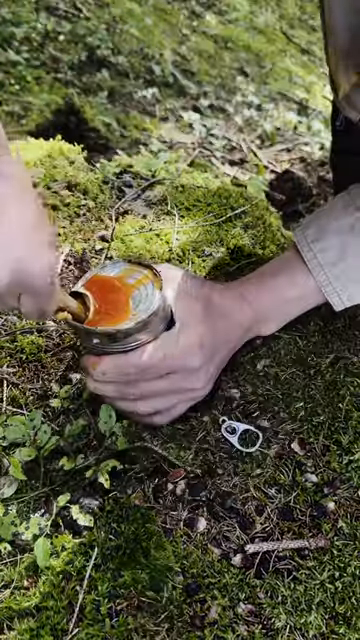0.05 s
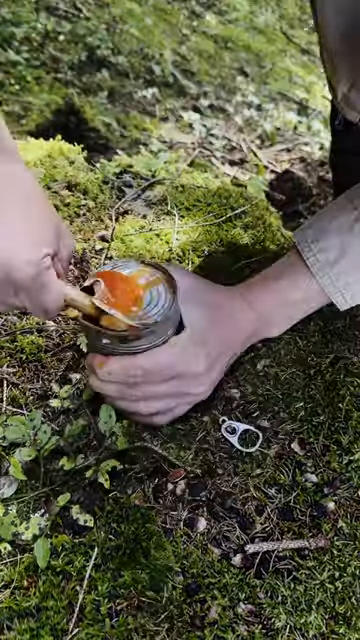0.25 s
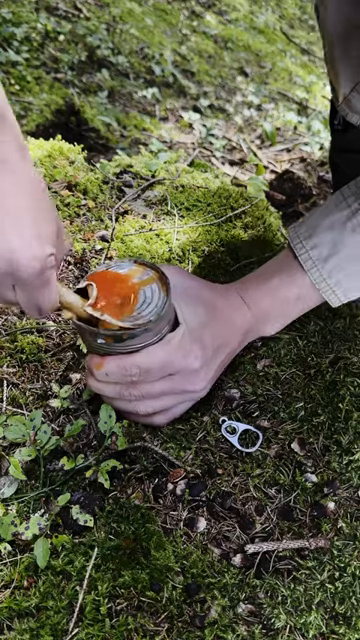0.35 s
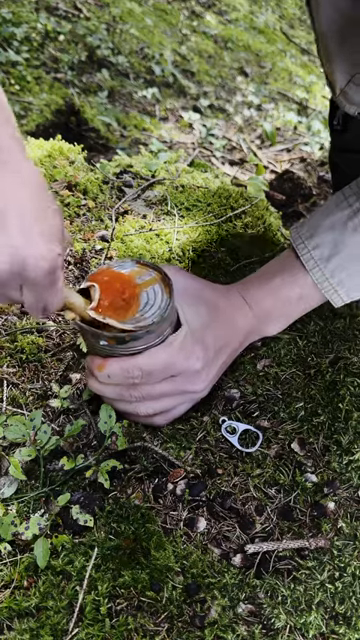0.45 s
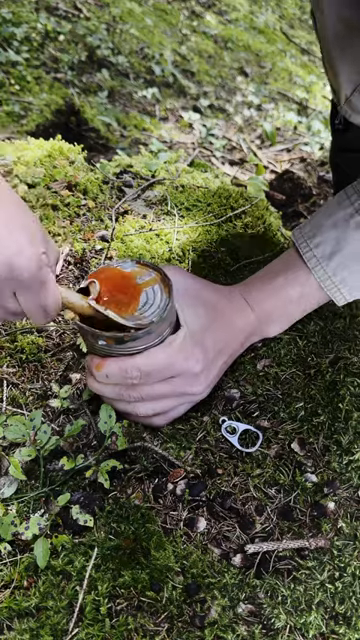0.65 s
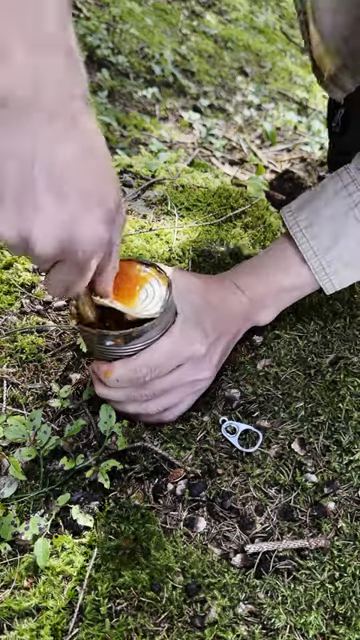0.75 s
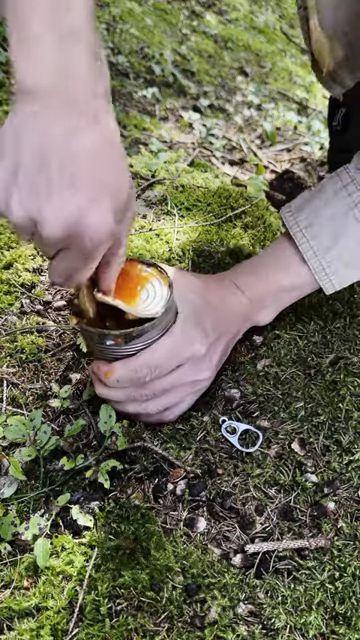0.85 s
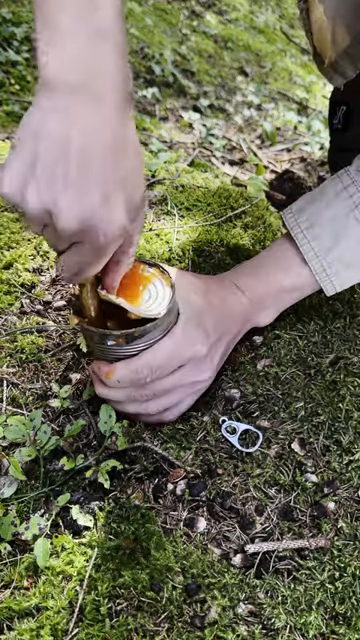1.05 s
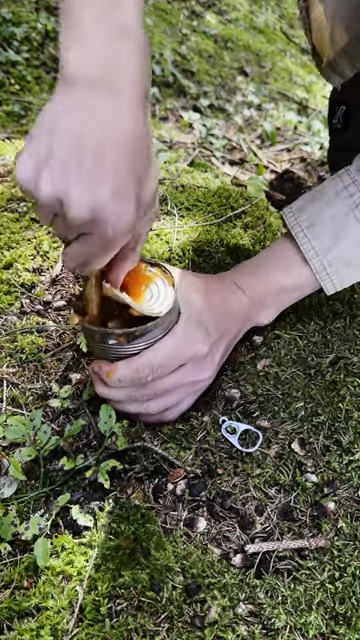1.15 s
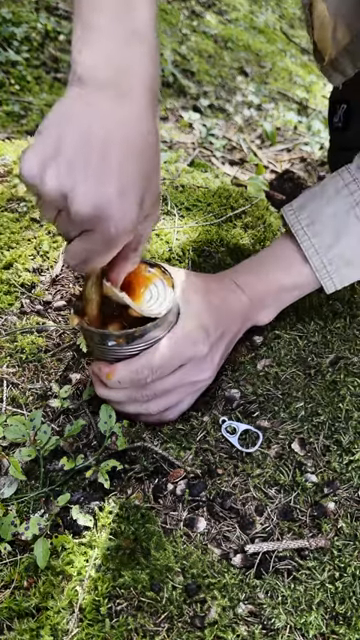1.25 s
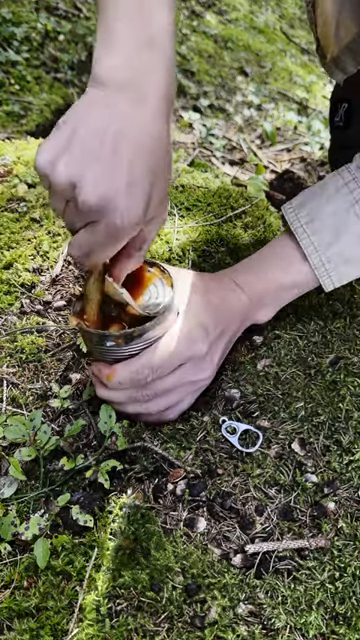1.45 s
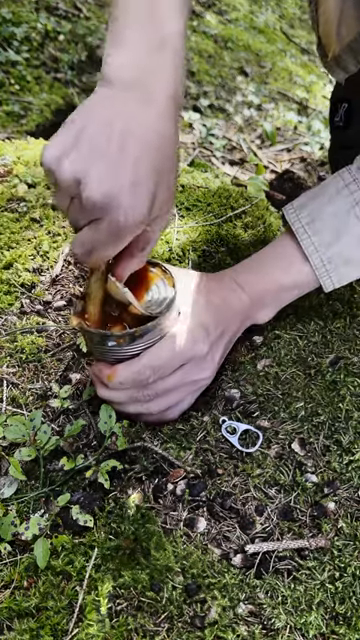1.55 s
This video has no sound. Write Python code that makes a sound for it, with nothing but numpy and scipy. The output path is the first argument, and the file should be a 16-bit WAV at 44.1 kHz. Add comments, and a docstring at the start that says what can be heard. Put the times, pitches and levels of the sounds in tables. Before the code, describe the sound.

A thin metal tin lid crinkles and snaps close by as a stick pries it up. Two sharp snaps stand out among small ticks, then the stick briefly judders along the cut edge, over faint forest hiss.

```python
"""Over soft handling rumble and a faint forest hiss, a thin metal lid crinkles and snaps close by.
A stick is prising up the half-open lid of a food tin held on the forest floor. As the lid buckles,
each snap gives a tiny falling chirp, a bright ring, a short tone from the bending and a thud of the can.
Then the stick judders along the cut edge in a run of slips. The trees return a faint echo."""
import sys
import numpy as np
from scipy import signal
from scipy.fft import rfft, irfft, next_fast_len
from scipy.io import wavfile

SR = 44100
rng = np.random.default_rng(int(sys.argv[2]) if len(sys.argv) > 2 else 0)


def generate_wav(signal):
    """Clip the signal to [-1, 1] and save it as 16-bit WAV at the path in sys.argv[1]."""
    frames = np.transpose(np.atleast_2d(signal))
    scaled = np.clip(frames, -1, 1) * 32767
    pcm = np.round(scaled).astype(np.int16)
    wavfile.write(sys.argv[1], SR, pcm)


N = 70560  # 1.6 seconds


def amp(db):
    """Turn decibels into a number to multiply a sound by."""
    return 10 ** (np.asarray(db) / 20)


def unit(x):
    """Scale a sound to an average strength (rms) of 1."""
    return x / np.sqrt(np.mean(x ** 2) + 1e-20)


def along(points, hz):
    """Read a curve of (frequency, value) points, with the octaves evenly spaced."""
    frequencies, values = np.transpose(points)
    return np.interp(np.log(hz + 1), np.log(frequencies + 1), values)


def level(rows):
    """Join (time, decibel) points into one gain for every sample."""
    return amp(np.interp(np.arange(N) / SR, *np.transpose(rows)))


def filtered(x, response):
    """Scale and delay each frequency of a sound as response(hz) says."""
    size = x.shape[-1]
    padded = next_fast_len(size + 8192)
    return irfft(rfft(x, padded) * response(np.fft.rfftfreq(padded, 1 / SR)), padded)[..., :size]


def noise(colour, shape):
    """Noise of strength 1; its colour says how strong each frequency is."""
    return unit(filtered(rng.standard_normal(shape), lambda hz: amp(along(colour, hz))))


def wide_noise(colour, side_db):
    """Stereo noise: the lower side_db is, the more alike left and right sound."""
    middle, side = noise(colour, (2, N))
    return unit(np.array([middle + amp(side_db) * side, middle - amp(side_db) * side]))


def add(track, start_s, sound):
    """Mix a sound into the track at the given time."""
    part = track[max(round(start_s * SR), 0):][:len(sound)]
    part += sound[:len(part)]


def decay(t, fade_s):
    """Die away by 60 dB over the fade time."""
    return np.exp(-np.log(1000) * t / fade_s)


def click(colour, size, ripple_db=.8):
    """The ring after one tap, with peak 1; its colour changes a little from tap to tap."""
    hz = np.fft.rfftfreq(2 * size, 1 / SR)
    ripple_grid = np.linspace(np.log(100), np.log(SR / 2), 40)
    ripple = np.interp(np.log(hz + 1), ripple_grid, rng.standard_normal(40))
    cepstrum = irfft(np.log(amp(along(colour, hz) + ripple_db * ripple)))
    # Folding onto the first half keeps the colour and makes the ring start at the tap.
    cepstrum[1:size] *= 2
    cepstrum[size + 1:] = 0
    ring = irfft(np.exp(rfft(cepstrum)))[:size]
    return ring / np.abs(ring).max()


def handling_and_hiss():
    """Handling makes a low rumble and a soft rustle, over the steady hiss of the forest."""
    # How the rumble and the rustle swell and sink: (time [s], level [dB])
    rumble_level = [(0.0, -74), (0.11, -63), (0.16, -72), (0.248, -60), (0.31, -60), (0.328, -75),
                    (0.454, -54), (0.524, -68), (0.712, -66), (0.806, -93.5), (0.86, -63), (0.918, -73.5),
                    (1.234, -72), (1.256, -65), (1.576, -66), (1.6, -83.5)]
    rustle_level = [(0, -65), (.2, -64), (.33, -63.5), (.4, -69), (.5, -66.5), (.57, -65), (.67, -66.5),
                    (.73, -68), (.78, -77.5), (.95, -80.5), (1.08, -75.5), (1.2, -70), (1.3, -66),
                    (1.42, -67), (1.52, -65), (1.6, -65)]
    # Colours of the three noises: (frequency [Hz], level [dB])
    rumble_colour = [(20, -23.5), (40, -11.5), (64, 11), (85, 1), (130, -15), (250, -54.5)]
    rustle_colour = [(50, -9), (120, 2), (220, 1), (450, -4.5), (800, -14), (1500, -30.5), (2500, -22),
                     (9000, -38.5), (16000, -44.5)]
    hiss_colour = [(100, -10.5), (600, 2), (1200, -3.5), (2000, -8.5), (2800, 3), (5000, -3), (7000, -10.5),
                   (9500, -15), (11000, -31.5), (14000, -21.5), (16000, -32.5)]
    rumble = level(rumble_level) * wide_noise(rumble_colour, side_db=-24)
    rustle = level(rustle_level) * wide_noise(rustle_colour, side_db=-7)
    hiss = amp(-71.5) * wide_noise(hiss_colour, side_db=-2.5)
    return rumble + rustle + hiss


def lid_crinkle(ticks_per_s=4000):
    """The strained lid gives off a dense patter of tiny ticks."""
    # How loud the crinkle is: (time [s], level [dB])
    crinkle_level = [(0, -79), (.12, -73.5), (.17, -67), (.205, -59), (.226, -55), (.234, -34), (.248, -53),
                     (.275, -59), (.31, -79), (.36, -74.5), (.41, -68), (.46, -85.5), (1.22, -85.5),
                     (1.33, -71.5), (1.42, -66.5), (1.49, -78), (1.6, -87.5)]
    # Colour of a tick: (frequency [Hz], level [dB])
    tick_colour = [(200, -18), (700, -3.5), (1350, 3), (2000, 0), (2900, -7.5), (4000, -8.5), (6000, -16.5),
                   (7800, -16.5), (9600, -12.5), (11500, -24), (16000, -32.5)]
    ticks = (rng.random(N) < ticks_per_s / SR) * rng.standard_normal(N)
    patter = signal.fftconvolve(ticks, click(tick_colour, size=1024))[:N]
    return level(crinkle_level) * unit(patter)


def lid_snaps():
    """The lid buckles: each snap is a short flex (bending) tone, a ring, a gritty crack and a thud."""
    # One row per snap: (time [s], flex pitch [Hz], flex level [dB], flex rise time [s],
    # flex fade time [s], ring level [dB], crack level [dB], thud level [dB])
    snaps = [ (0.0189, 1730, -63, 0.00049, .008, -52.5, -46.5, -60),
             (0.1399, 1410, -49, 0.00085, 0.015, -47, -39.5, -61),
             (0.1441, 1510, -58.5, .0004, .010, -50.5, -37, -73.5),
             (0.2162, 1237, -10, 0.00044, 0.031, -6, -6.5, -32),
             (.2292, 1260, -26, 0.0025, .012, -22, -27.5, -38.5),
             (0.2299, 1336, -13, 0.0003, 0.022, -15.5, -27.5, -27.5),
             (0.232, 1396, -32, .0006, .020, -21.5, -24, -34),
             (.2435, 1384, -43, 0.00065, 0.029, -52, -54, -43),
             (.2520, 1310, -44.5, 0.0005, .020, -56.5, -57, -52.5),
             (0.2572, 1290, -36, .0008, .020, -42.5, -46, -49),
             (0.2647, 1380, -47, 0.00062, 0.021, -47.5, -50.5, -57),
             (.3283, 1408, -58, 0.00055, .010, -53, -55, -67.5),
             (.3820, 1365, -36.5, 0.00021, 0.035, -27.5, -28, -52.5),
             (0.39, 1370, -44.5, 0.00026, 0.031, -32.5, -35.5, -51),
             (0.5486, 2120, -40, 0.000242, .018, -48, -46, -56),
             (.5506, 1490, -44, 0.00041, .028, -37, -74, -62),
             (0.5535, 1970, -47, .0006, .022, -47, -69.5, -85),
             (.5605, 1824, -41, 0.00062, .020, -50, -74.5, -50),
             (.5686, 1786, -40.5, .0005, .014, -40, -57, -68),
             (.8334, 1818, -7, 0.0017, 0.0089, -15, -16, -44.5),
             (1.114, 1910, -67, 0.00066, 0.014, -70, -74, -65),
             (1.1790, 1867, -46.5, 0.00064, 0.0081, -42.5, -53.5, -48),
             (1.2668, 1957, -60, .0005, 0.019, -58, -75, -81)]
    # Higher tones shaken by a flex: (frequency [Hz], level relative to the flex [dB], fade time [s])
    overtones = [(2410, -29.5, .014), (3543, -29, 0.03), (4590, -36, .016), (6006, -35.5, .012)]
    # Colours of the lid's ring, its treble and the full can's thud: (frequency [Hz], level [dB])
    ring_colour = [(200, -50.5), (800, -36), (980, -5), (1200, -7.5), (1500, -4.5), (2050, 4),
                   (2280, -12.5), (2440, -4.5), (3000, -11.5), (3800, -26), (4500, -11), (5300, -29),
                   (9000, -50)]
    treble_colour = [(1500, -34.5), (3100, -14.5), (3480, -3.5), (3800, -19), (4150, -22), (4550, -7.5),
                     (5300, -14), (6000, -6), (6700, -10.5), (7500, -14.5), (8400, -17.5), (9000, -2),
                     (9450, 1.5), (10200, -9), (11500, -23), (13800, -20), (14500, -24.5), (15900, -21),
                     (16800, -36.5)]
    thud_colour = [(80, -31.5), (200, -13), (360, 0), (460, -8), (690, 3), (1000, -3.5), (1500, -8),
                   (4000, -50)]
    octave_db, scuff_db = -16, -8
    size = SR // 10
    track, t = np.zeros(N), np.arange(size) / SR
    for start_s, hz, flex_db, rise_s, fade_s, ring_db, crack_db, thud_db in snaps:
        swell = (1 - np.exp(-t / rise_s)) ** 2 * decay(t, fade_s)
        swing = amp(flex_db) * swell / swell.max()
        phase = 2 * np.pi * hz * t
        # A hard flex is lopsided, which adds a tone one octave up.
        flex = swing * np.sin(phase) + amp(octave_db) * swing ** 2 * np.sin(2 * phase)
        for tone_hz, tone_db, tone_fade_s in overtones:
            flex += amp(flex_db + tone_db) * decay(t, tone_fade_s) * np.sin(2 * np.pi * tone_hz * t)
        treble = click(treble_colour, size)
        scuff = rng.standard_normal(size) * decay(t, fade_s=.010)
        scuffed_treble = signal.fftconvolve(treble, scuff / np.linalg.norm(scuff))[:size]
        crack = amp(crack_db) * (treble + amp(scuff_db) * scuffed_treble)
        ring = amp(ring_db) * click(ring_colour, size)
        thud = amp(thud_db) * click(thud_colour, size)
        add(track, start_s, flex + ring + crack + thud)
    return through_tin(track, travel_s=.0008)


def through_tin(x, travel_s):
    """High bending waves arrive first, so clicks become falling chirps; a 1 kHz wave takes travel_s."""
    return filtered(x, lambda hz: np.exp(-4j * np.pi * travel_s * np.sqrt(1000 * hz)))


def stick_slips():
    """The stick catches and lets go on the cut edge; each slip rings the lid and sheds some grit."""
    # One row per slip: (time [s], level [dB], grit level relative to the slip [dB])
    slips = [(1.3568, -40, -34.5), (1.3640, -35.5, -12), (1.3723, -45, -17.5), (1.3766, -31, -17),
             (1.3893, -38, -31.5), (1.3933, -44, -5), (1.4032, -45, -16), (1.4060, -28.5, -9),
             (1.4105, -34, -17.5), (1.4171, -34, -21), (1.4206, -40, -18), (1.4263, -27, -13),
             (1.431, -35, -9.5), (1.4488, -35, -16.5), (1.4517, -36, -12), (1.4537, -46, -3),
             (1.4594, -36.5, -12.5), (1.4608, -44, 6)]
    # Colours of the lid held taut by the stick, and of the grit: (frequency [Hz], level [dB])
    edge_colour = [(300, -33), (900, -16), (1300, -23), (1700, -3), (2080, 10), (2500, 2.5), (3100, -6),
                   (3950, -7), (4350, -17.5), (4750, -6), (5650, -11), (7400, -25), (8050, -9.5),
                   (8800, -23.5), (11500, -24.5), (13500, -20.5), (15000, -26), (16500, -36)]
    grit_colour = [(800, -3.5), (2000, 1), (5000, 16), (7200, 0), (9000, 8), (14000, -14), (16500, -29.5)]
    size = SR // 20
    track, t = np.zeros(N), np.arange(size) / SR
    for start_s, slip_db, grit_db in slips:
        grit = amp(grit_db) * noise(grit_colour, size) * decay(t, fade_s=.008)
        add(track, start_s, amp(slip_db) * (click(edge_colour, size) + grit))
    return through_tin(track, travel_s=.0014)


def at_microphones(x):
    """The can is a little nearer the left microphone, so it is earlier and mostly louder there."""
    # How much louder the left side is: (frequency [Hz], left minus right [dB])
    left_db = [(300, 0), (800, 1), (1250, 5.2), (1800, 3.8), (2400, 2.6), (4500, 4.8), (6500, 4.5),
               (9300, .2), (13000, -1.2)]
    # How far the left wave runs ahead: (frequency [Hz], phase lead [radians])
    left_lead = [(100, 0), (1300, .25), (1800, .45), (2400, .95), (3300, 1.2), (5800, 1.15), (9000, 1.55),
                 (13000, 1.2)]
    side = np.array([[.5], [-.5]])  # half up on the left, half down on the right
    return filtered(x, lambda hz: amp(side * along(left_db, hz)) * np.exp(1j * side * along(left_lead, hz)))


def tree_echo(x, echo_db=-36, gap_s=.02):
    """Sound bounces off the trees and comes back faintly after a short gap."""
    # Colour of the echo: (frequency [Hz], level [dB])
    echo_colour = [(200, -6), (700, -17), (1100, -1.5), (1700, -5), (3500, 4), (9500, -0.5), (15000, 2.5)]
    # How long the echo lasts: (frequency [Hz], fade time [s])
    fade_times = [(300, 0.35), (1500, .6), (4000, .4), (10000, 0.48), (16000, 0.34)]
    size = SR // 2
    hz, t, bands = signal.stft(noise(echo_colour, (2, size)), SR, nperseg=256)
    fading_bands = bands * decay(t, along(fade_times, hz)[:, None])
    tail = signal.istft(fading_bands, SR, nperseg=256)[1][:, :size]
    late_tail = np.pad(tail / np.linalg.norm(tail[0]), ((0, 0), (round(gap_s * SR), 0)))
    return amp(echo_db) * signal.fftconvolve(x[None], late_tail, axes=1)[:, :N]


def scene():
    """Mix the nearby tin, its echo and the background in stereo."""
    tin = lid_snaps() + stick_slips() + lid_crinkle()
    return at_microphones(tin) + tree_echo(tin) + handling_and_hiss()


def record(dry):
    """Cut away the very highest treble."""
    top_hz = 16450
    return filtered(dry, lambda hz: 1 / (1 + (hz / top_hz) ** 120))


dry = scene()
out = record(dry)
generate_wav(out)
```